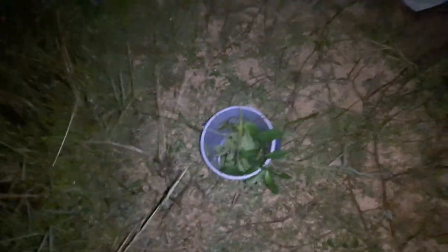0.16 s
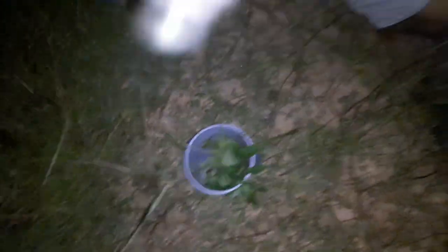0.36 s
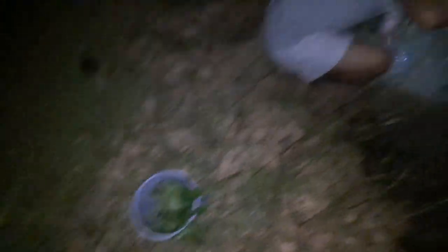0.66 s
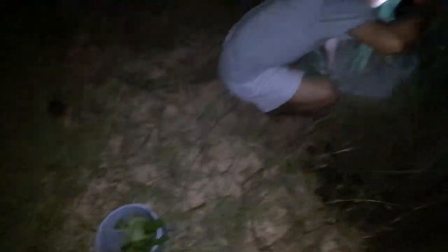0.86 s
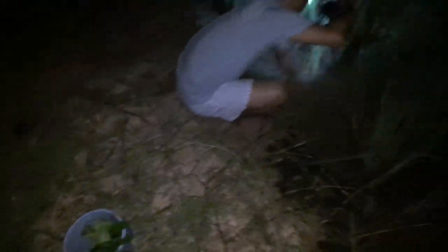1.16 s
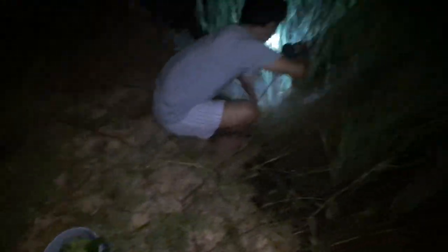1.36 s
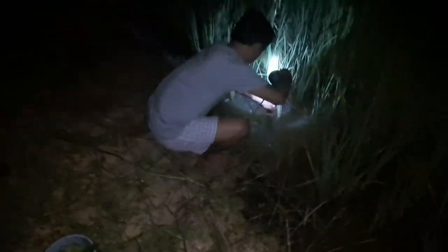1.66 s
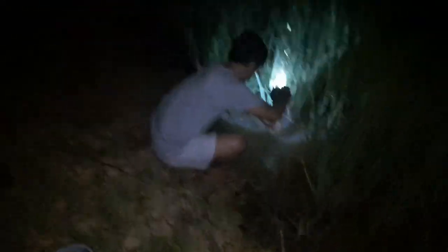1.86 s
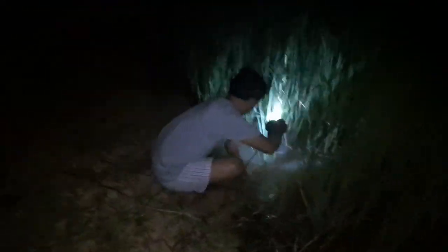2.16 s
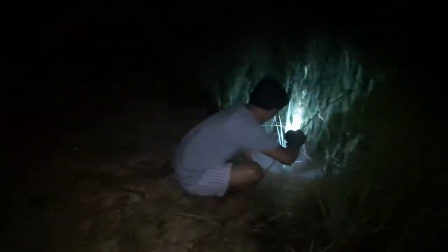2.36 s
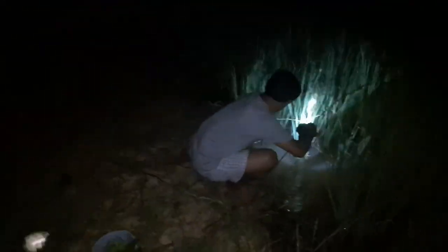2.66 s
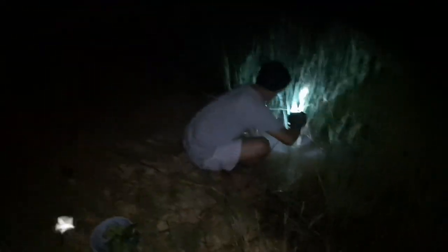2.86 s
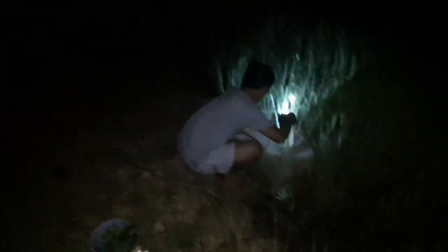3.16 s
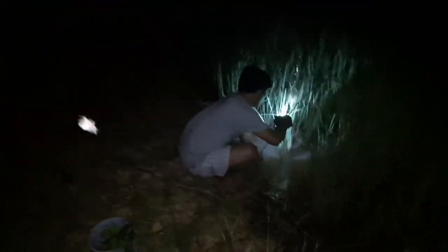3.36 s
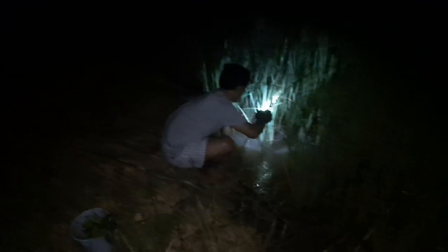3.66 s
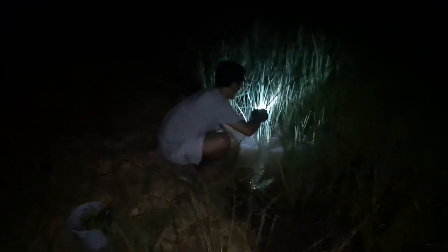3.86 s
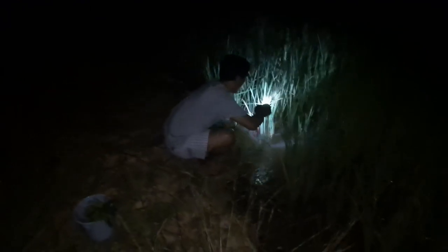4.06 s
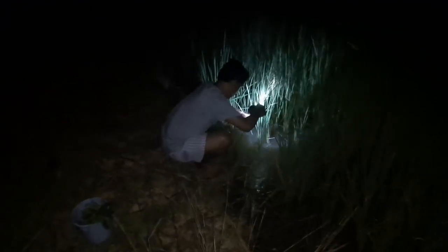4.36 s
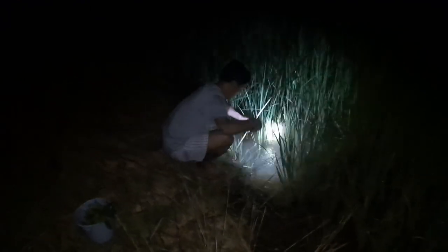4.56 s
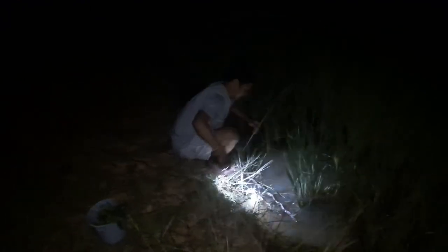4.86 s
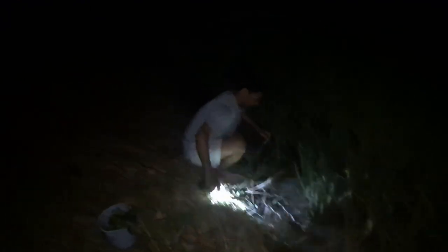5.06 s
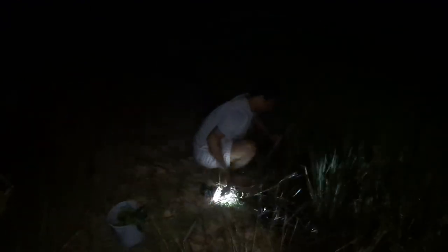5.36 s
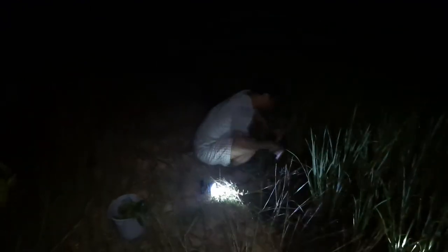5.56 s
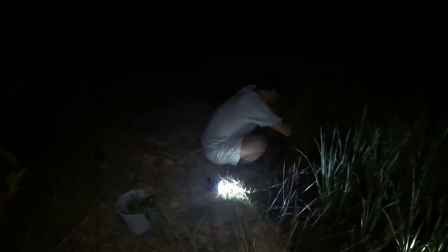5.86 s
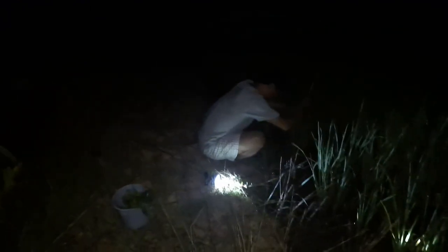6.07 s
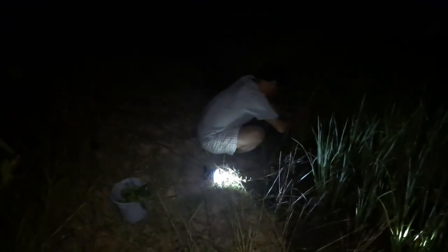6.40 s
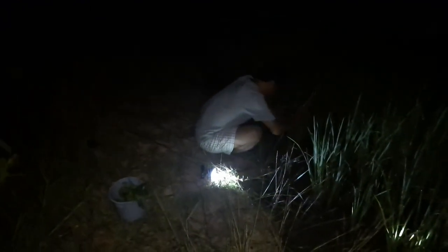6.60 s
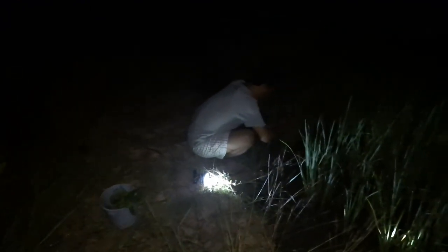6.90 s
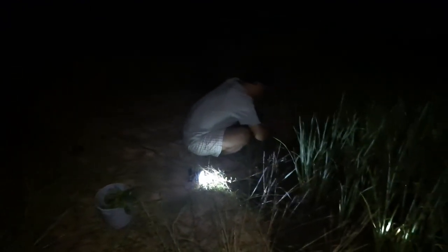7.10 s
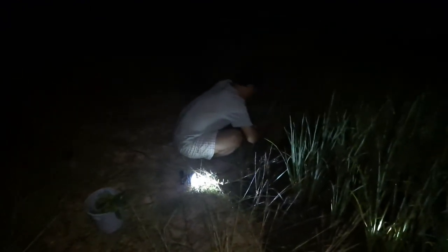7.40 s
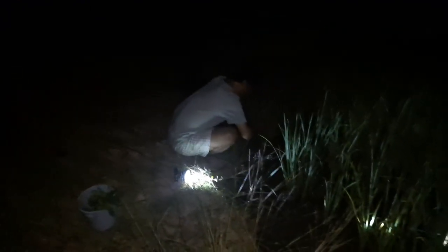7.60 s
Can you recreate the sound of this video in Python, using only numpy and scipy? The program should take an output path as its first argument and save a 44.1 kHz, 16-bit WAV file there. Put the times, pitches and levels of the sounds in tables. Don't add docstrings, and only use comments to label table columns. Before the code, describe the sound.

Continuous insect trill and thin high hiss fill an open, nearly echoless night beside reeds. Wet plops, sloshes and hollow stem knocks begin at once with sharp dry snaps, and soon a sputtering run of frog peeps. Distant frogs rasp rhythmically, one whistles, then another busy burst of clacks and crackle. Later the handling quiets, leaving peeps, small whistles and insects in wide stereo.

```python
import sys
import numpy as np
from scipy import signal
from scipy.fft import rfft, irfft, next_fast_len
from scipy.io import wavfile
from scipy.ndimage import uniform_filter1d, map_coordinates

SR = 44100
rng = np.random.default_rng(int(sys.argv[2]) if len(sys.argv) > 2 else 0)


def boost(x):
    u = np.asarray(x, float) / 20
    return 10 ** u


def file_out(sig):
    cols = np.atleast_2d(sig).T
    lim = np.clip(cols, -1, 1)
    pcm = np.round(lim * 32767).astype(np.int16)
    wavfile.write(sys.argv[1], SR, pcm)


N = 341334

# start in seconds, peak level in dB, pitch in Hz, length in seconds.
PEEPS = [(0.8235, -27.5, 3296, 0.02), (1.074, -38.5, 3100, 0.038), (1.126, -33, 3130, 0.019),
         (1.276, -29, 3170, 0.035), (1.364, -32.5, 3100, 0.024), (1.413, -33.5, 3180, 0.032),
         (1.525, -38, 3200, 0.0092), (4.95, -31, 3297, 0.019), (5.159, -39.5, 3330, 0.042),
         (5.211, -34, 3250, 0.027), (5.368, -30, 3276, 0.025), (5.446, -32.5, 3290, 0.017),
         (5.522, -34.5, 3270, 0.022), (5.68, -30.5, 3300, 0.027), (5.772, -32, 3190, 0.015),
         (5.836, -35.5, 3320, 0.02), (5.877, -36, 3280, 0.012), (7.217, -44, 3354, 0.037),
         (7.392, -40.5, 3430, 0.019), (7.495, -43.5, 3400, 0.019), (7.643, -39, 3220, 0.01),
         (7.701, -36, 3090, 0.005)]


def unit(x):
    return x / np.sqrt(np.mean(x ** 2) + 1e-20)


def along(points, hz):
    f, v = np.transpose(points)
    return np.interp(np.log(hz + 1), np.log(f + 1), v)


def curves(*tables):
    out = np.full((len(tables[0][0]) - 1, N), -120.)
    for s, *cols in map(np.transpose, tables):
        k = np.arange(round(s[0] * SR), min(N, round(s[-1] * SR) + 1))
        out[:, k] = [np.interp(k / SR, s, c) for c in cols]
    return out


def along_time(points):
    return np.interp(np.arange(N) / SR, *np.transpose(points))


def wobble(rate):
    knots = rng.standard_normal(int(N * rate / SR) + 4)
    return map_coordinates(knots, [np.arange(N) * rate / SR])


def filtered(x, response):
    m = next_fast_len(N + 8192)
    return irfft(rfft(x, m) * response(np.fft.rfftfreq(m, 1 / SR)), m)[..., :N]


def modes(table, order=1):
    def response(f):
        total = 0
        for k, (c, w, db) in enumerate(table):
            peak = 1j * f * w / (c * c - f * f + 1j * f * w)
            total = total + (-1) ** k * boost(db) * peak ** order
        return total
    return response


def placed(x, pan_db, lag, wet_db):
    # frequency in Hz, time to fall 60 dB in seconds.
    bank = [(300, 0.12), (3000, 0.18), (10000, 0.036)]
    hz, t, z = signal.stft(rng.standard_normal((2, SR // 3)), SR, nperseg=256)
    fading = z * boost(-60 * t / along(bank, hz)[:, None])
    tail = signal.istft(fading, SR, nperseg=256)[1]
    tail = tail / np.linalg.norm(tail[0])
    wet = signal.fftconvolve(np.pad(x, (300, 0))[None], tail, axes=1)[:, :N]
    side = np.array([[.5], [-.5]])
    direct = filtered(x, lambda f: np.exp(-2j * np.pi * f * lag * side / SR))
    return boost(pan_db * side) * (direct + boost(wet_db) * wet)


def scraped(hz, width_hz, rate, sharp, pure=0):
    beat = np.cumsum(rate * (1 + 0.0043 * wobble(2.947))) / SR
    strokes = np.exp(sharp * np.cos(2 * np.pi * beat))
    noisy = unit(filtered(strokes * rng.standard_normal(N), modes([(hz, width_hz, 0)], order=3)))
    turn = 2 * np.pi * np.cumsum(hz + .11 * width_hz * wobble(70)) / SR
    ring = np.sin(turn) * boost(1.5 * wobble(40))
    return unit((1 - pure) * noisy + pure * unit(strokes ** 1.5 * ring))


def grains(count, hz, spread, cycles, size_db):
    when = (rng.random(count) * N).astype(int)
    pitch = rng.standard_normal(count).clip(-2, 2)
    size = rng.exponential(size=count).clip(0, 3)
    f = (hz[when] * np.exp(spread * pitch))[:, None]
    t = np.arange(int(10.0 * cycles * SR / np.median(hz)))
    u = f * t / SR
    shape = boost(-30 * u / cycles) * (1 - np.exp(-u))
    rows = boost(size_db * size)[:, None] * np.sin(2 * np.pi * u) * shape
    return unit(np.bincount((when[:, None] + t).ravel(), rows.ravel(), N)[:N])


def puffs(calls):
    t = np.arange(0, N, 64) / SR
    slow = sum(boost(db) * np.exp(-((t - s) / (0.56 * length)) ** 4) for s, db, length in calls)
    return np.interp(np.arange(N) / SR, t, slow)


def night_air():
    # frequency in Hz, level in dB per Hz.
    colour = [(25, -14), (45, -29), (88, -0.5), (400, -22.5), (1000, -29.5), (1400, -35), (1750, -14.5),
              (2600, -12), (4200, -12.5), (5740, -24.5), (7000, -15.5), (8300, -18), (11000, -19),
              (13000, -23), (16000, -42)]
    # frequency in Hz, likeness from 0 to 1.
    alike = [(60, .94), (300, 0.85), (700, 0.05), (15000, 0.017)]

    def mid_and_side(f):
        turn = np.arccos(np.clip(along(alike, f), -1, 1)) / 2
        return boost(along(colour, f)) * [np.cos(turn), np.sin(turn)]

    def tilt(f):
        return boost(along([(7000, 0), (9000, 0.46)], f) * [[-1], [1]])

    mid, side = filtered(rng.standard_normal((2, N)), mid_and_side)
    air = unit(filtered(np.array([mid + side, mid - side]), tilt))
    air_db = -44 - 0.64 * np.arange(N) / SR
    return boost(air_db) * air


def far_engine():
    # middle in seconds, level in dB, length in seconds.
    gusts = [
        (0.1, -55, 1.3),
        (2.0, -50.5, 0.34),
        (3.15, -41, 0.75),
        (3.7, -50, 0.31),
        (4.65, -51, 0.29),
        (6.2, -57, 1.2),
        (6.95, -48.5, 0.14),
        (7.6, -49, 0.079),
    ]
    idle_db = -53.5
    loudness = boost(idle_db) + puffs(gusts)
    noise = rng.standard_normal(N) + 0.19 * rng.standard_normal((2, N))
    return boost(-9.0) * loudness * unit(filtered(noise, modes([(64.6, 10.8, 0)], order=2)))


def cricket_trill():
    # time in seconds, level in dB.
    trill = [(0, -47.5), (0.93, -44), (1.33, -47.5), (2.5, -45.5), (4.3, -47), (4.61, -44), (5.1, -46),
             (7, -46.5), (7.74, -47.5)]
    loudness = boost(curves(trill)[0] + 0.83 * wobble(6))
    return placed(loudness * scraped(2140, 450, 122.3, sharp=0.66, pure=.55), pan_db=.5, lag=20.5, wet_db=-8)


def bush_cricket():
    swell_db, peak_s, span_s = 8.5, 5.3, .8
    t = np.arange(N) / SR
    loudness = boost(-65 + swell_db * np.exp(-((t - peak_s) / span_s) ** 2))
    count = np.floor(np.cumsum(203.5 * (1 + 0.00087 * wobble(1.4))) / SR)
    teeth = np.diff(count, prepend=0) * boost(2.4 * wobble(150))
    buzz = unit(filtered(teeth, modes([(10400, 950, 0), (12400, 2000, -6)], order=3)))
    return placed(loudness * buzz, pan_db=-5, lag=0, wet_db=-10)


def katydid():
    # time in seconds, lateness in seconds.
    late = [(0, -.05), (1.5, -.05), (3.4, .07), (4.4, .02), (5.5, 0), (7.75, 0)]
    t = np.arange(N) / SR
    turn = 2 * np.pi * (t - curves(late)[0] - 5.97) / .283
    phrases = 1 / (1 + np.exp(6 * np.cos(turn) - 1.5))
    loudness = boost(-58 + .5 * t + 1.5 * wobble(1.5))
    song = phrases * scraped(8350, 620, 60, sharp=.3, pure=.25)
    return placed(loudness * song, pan_db=-5, lag=14, wet_db=-12)


def tree_cricket():
    t = np.arange(N) / SR
    turn = 2 * np.pi * ((t - 2.04) * 6.2 + .12 * wobble(2))
    chirps = 1 / (1 + np.exp(-(1.2 + .3 * t) * np.cos(turn) - wobble(3)))
    loudness = boost(-59 - .3 * t + 2 * wobble(1.5))
    song = chirps * scraped(7530, 300, 108, sharp=.6)
    return placed(loudness * song, pan_db=1.5, lag=-6, wet_db=-10)


def high_caller():
    blips = [3.25, 3.67, 3.98, 4.31, 4.6, 4.88, 5.14, 5.5, 5.85]
    loudness = boost(-68 + 2 * wobble(2)) + puffs([(s, -60, .04) for s in blips])
    return placed(loudness * scraped(6400, 500, 90, sharp=.3), pan_db=12.5, lag=-11.5, wet_db=-11.5)


def high_drone():
    loudness = boost(-60.0 + 1.2 * wobble(5.5))
    return placed(loudness * scraped(9390, 1760, 210, sharp=0.19), pan_db=-9, lag=10.6, wet_db=3.0)


def far_raspers():
    # middle in seconds, level in dB, small frog over large frog in dB.
    rasps = [(0.36, -46, 9), (0.63, -37.5, -4), (0.84, -39, -2), (1.139, -40, -4), (1.38, -57, 0),
             (1.601, -44, -7), (1.78, -45.5, -13), (1.92, -46.5, -9), (2.18, -37.5, -5), (2.38, -36.5, -1),
             (2.568, -36, -4), (2.76, -39.5, -3), (2.91, -38, -6), (3.1, -44.5, -10), (3.27, -44, -6),
             (3.34, -43, 0), (3.709, -36, 0.5), (4.1, -39, 10), (4.319, -37.5, 8.5), (4.55, -37, 8),
             (4.814, -37.5, 7), (5.03, -32.5, -3), (5.22, -38.5, 7), (5.46, -40.5, 8), (5.66, -37.5, 4),
             (5.84, -47, 0), (6.05, -39, -6), (6.22, -52, -13), (6.34, -64, -7), (6.7, -45, 6),
             (6.91, -43.5, -6), (7.14, -44, 0), (7.24, -44, -3), (7.39, -47, -9), (7.51, -46, -3)]
    rasp_s = .06
    large = puffs([(s, db - tilt / 2, rasp_s) for s, db, tilt in rasps])
    small = puffs([(s, db + tilt / 2, rasp_s) for s, db, tilt in rasps])
    large = large * scraped(3340, 620, 47, sharp=0.11)
    small = small * unit(scraped(3586, 230, 58, sharp=0.58) + scraped(3886, 300, 70, sharp=0.51))
    return placed(boost(-9.5) * (large + small), pan_db=0.6, lag=-8, wet_db=-4.0)


def noise_puffs():
    # middle in seconds, level in dB, length in seconds.
    single_puffs = [(0.09, -47.5, 0.0065), (0.44, -66, 0.31), (0.63, -50, 0.015), (1.78, -68, 0.12),
                    (1.92, -68, 0.046), (2.14, -57.5, 0.031), (2.72, -61, 0.032), (2.9, -62, 0.079),
                    (3.11, -67, 0.062), (3.44, -55.5, 0.02), (3.86, -54.5, 0.026), (6.66, -59, 0.013),
                    (6.89, -71, 0.32), (7.13, -58, 0.02)]
    halo_db, halo_longer = -22, 1.1
    halos = [(s + length / 2, db + halo_db, halo_longer * length) for s, db, _, length in PEEPS]
    sound = boost(10.5) * puffs(single_puffs + halos) * scraped(3050, 1600, 95, sharp=0.11)
    return placed(sound, pan_db=15.5, lag=9.9, wet_db=-12.5)


def far_row():
    row = boost(-57 + 2.5 * wobble(9)) * scraped(3900, 600, 110, sharp=0.5, pure=.3)
    return placed(row, pan_db=0.5, lag=17.7, wet_db=1.5)


def beetle():
    # middle in seconds, level in dB, length in seconds.
    passes = [
        (0.25, -57, .2),
        (2.75, -62.5, 0.52),
        (4.3, -65, 0.14),
        (4.85, -62, .2),
        (5.3, -64.5, 0.156),
        (6.4, -64.5, 0.53),
    ]
    return placed(puffs(passes) * scraped(265, 101, 30, sharp=0.068), pan_db=2.5, lag=1, wet_db=-13)


def chirper():
    # start in seconds, level in dB, length in seconds.
    chirps = [
        (3.518, -40, 0.036),
        (3.783, -40.5, 0.045),
        (4.015, -42, 0.046),
        (4.24, -43.5, 0.066),
        (4.464, -41.5, 0.055),
        (4.689, -38.5, 0.043),
    ]
    # multiple of the voice's base pitch, level in dB.
    overtones = [(4, -17), (6, -10.5), (7, -11.5), (8, 0)]
    eighth_hz, droop = 3330, 0.079
    out = np.zeros(N)
    for s, db, length in chirps:
        u = np.arange(round(length * SR)) / (length * SR)
        turn = 2 * np.pi * np.cumsum(eighth_hz / 8 * (1 - droop * u ** 3)) / SR
        shape = np.minimum(u / .12, 1) * (1 - u ** 6)
        stack = sum(boost(level) * np.sin(k * turn) for k, level in overtones)
        out[round(s * SR):][:len(u)] += boost(db) * shape * stack
    return placed(out * boost(1.7 * wobble(120)), pan_db=0.5, lag=1.2, wet_db=-5.0)


def whistle(start, s, end, hz, db, glide_hz, keeps_rising):
    hold = .72 * (end - s)
    rise = keeps_rising * glide_hz
    sag_hz = 40
    return [(start, hz - glide_hz * (s - start), min(-57, db - 21)),
            (s, hz, db),
            (s + hold, hz + rise * hold - sag_hz / 4, db - 5),
            (end, hz + rise * (end - s) - sag_hz, db - 19)]


def whistlers():
    # start, loudest and end in seconds, strongest overtone in Hz, level in dB.
    near_frog = [
        (0.56, 0.68, 0.765, 3950, -41),
        (2.7, 2.826, 2.915, 3958, -31),
        (4.54, 4.655, 4.735, 3950, -35),
        (6.43, 6.542, 6.63, 3938, -37),
        (7.01, 7.04, 7.075, 4000, -52),
    ]
    # start, loudest and end in seconds, strongest overtone in Hz, level in dB.
    farther_frog = [
        (0.745, 0.775, 0.805, 4150, -51),
        (0.9, 1.0, 1.1, 4020, -46),
        (4.41, 4.47, 4.54, 4100, -52),
        (6.14, 6.19, 6.24, 4030, -54),
        (6.275, 6.295, 6.325, 4040, -53),
        (6.77, 6.83, 6.9, 4080, -53),
    ]
    # multiple of the base pitch, level in dB.
    beside = [(2, -46), (3, -12), (4, -18), (5, -26), (7, -19.5), (8, -35)]
    knee = boost(-34.5)
    notes = 0
    for frog, glide_hz, keeps in (near_frog, 750, False), (farther_frog, 1550, True):
        hz, db = curves(*[whistle(*row, glide_hz, keeps) for row in frog])
        turn = 2 * np.pi * np.cumsum(hz.clip(3800) / 6) / SR
        gain = uniform_filter1d(boost(db + 9.5 - 2 * keeps), size=500)
        gain = gain * boost((1.2 + keeps) * wobble(70))
        others = sum(boost(level) * np.sin(k * turn) for k, level in beside)
        notes = notes + gain * np.sin(6 * turn) + boost(6) * gain / (1 + gain / knee) * others
    return placed(notes, pan_db=2.2, lag=3, wet_db=-19)


def peepers():
    # pitch in Hz, width in Hz, level in dB.
    sac = [(1830, 170, -42), (2264, 1000, 4.5), (3185, 980, 4.5), (4820, 1200, -1.5)]
    rasp_share, waver_hz = .2, 60
    echo_s, echo_db = .031, -13
    tone, rasp = np.zeros((2, N + SR))
    waver, flutter = wobble(160), boost(2.5 * wobble(250))
    t = np.arange(SR // 8) / SR
    for s, db, hz, length in PEEPS:
        shape = np.minimum(t / 0.001, 1) / (1 + np.exp((t - length) / 0.003))
        turn = 2 * np.pi * hz * t * (1.012 - 12 * t * t)
        turn += 2 * np.pi * waver_hz * np.cumsum(np.resize(waver[round(s * SR):], len(t))) / SR
        pulses = np.exp(.7 * np.cos(turn / 11)) * rng.standard_normal(len(t)) * boost(3 - 180 * t)
        first = round(s * SR) - 40
        at = slice(first, first + len(t))
        swell = shape * np.minimum(0.37 + t / 0.012, 1)
        tone[at] += boost(db - 0.9) * (1 - rasp_share) * swell * (np.sin(turn) + 0.092 * np.sin(turn / 2))
        rasp[at] += boost(db + 11.0) * rasp_share * shape * pulses
    call = flutter * tone[:N] + filtered(rasp[:N], modes(sac, order=3))
    call = call + boost(echo_db) * np.roll(call, round(echo_s * SR))
    return placed(call, pan_db=-0.5, lag=2.3, wet_db=-7.0)


def fly():
    # time in seconds, wing beat in Hz, level in dB.
    flight = [
        (4.955, 292, -73),
        (4.985, 291.4, -51),
        (5.02, 270, -67),
    ]
    hz, db = curves(flight)
    turn = 2 * np.pi * np.cumsum(hz.clip(1)) / SR
    overtones = [(1, 5.5), (2, 6.0), (3, 0), (4, -10), (5, -5)]  # multiple, dB
    buzz = sum(boost(level) * np.sin(k * turn) for k, level in overtones)
    return boost(db + np.array([[-14], [3]])) * buzz


def rustle():
    # time in seconds, level in dB.
    stalks = [(0.0, -102), (0.27, -74), (0.98, -97), (1.21, -62), (1.6, -66), (2.53, -76.5), (3.13, -69.5),
              (3.92, -59), (4.11, -67)]
    # middle in seconds, level in dB, length in seconds.
    brushes = [
        (0.2, -58, 0.62),
        (0.4, -62, 0.1),
        (2.16, -62, 0.12),
        (3.43, -60, 0.029),
        (3.56, -71, .05),
        (3.89, -65, 0.16),
    ]
    # frequency in Hz, level in dB per Hz.
    colour = [(1000, -26), (1500, -10), (3000, -7), (6000, -6), (9500, -1), (13000, -1), (16000, -5)]
    crackle = grains(count=20000, hz=np.full(N, 9000), spread=1.0, cycles=0.16, size_db=7.5)
    crackle = crackle + 0.84 * rng.standard_normal(N)
    crackle = unit(filtered(crackle, lambda f: boost(along(colour, f))))
    swish_db, clump_db = 1.5 * wobble(15), 3.2 * wobble(70).clip(-2, 2)
    loudness = (boost(curves(stalks)[0]) + puffs(brushes)) * boost(6.0 + swish_db + clump_db)
    return placed(loudness * crackle, pan_db=-4.5, lag=5, wet_db=3)


def snaps():
    # start in seconds, peak level in dB, body level over the peak in dB.
    breaks = [(0.285, -18, -24), (0.376, -44, -2), (0.4994, -32, -2), (0.614, -34.5, 8), (0.627, -28, 3),
              (0.759, -28, -16), (0.834, -34, -5), (0.704, -17, -16), (1.1968, -21, -15), (1.503, -25, -10),
              (1.79, -35, -4), (2.1025, -22.5, -11), (2.196, -46, 12), (2.2947, -26, -20), (3.4077, -35, 3),
              (3.4322, -15, -25), (3.714, -42, 4), (3.838, -46, -1), (3.8696, -15, -10), (3.9195, -44, 13),
              (4.8713, -31, -12), (5.499, -54, 24)]
    sharp, body = np.zeros((2, N + SR))
    t = np.arange(SR // 30) / SR
    for s, db, body_db in breaks:
        at = slice(round(s * SR), round(s * SR) + len(t))
        sharp[at] += boost(db - 60 * t / 0.02) * np.minimum(t / .006, 1) * rng.standard_normal(len(t))
        body[at] += boost(db + body_db - 3 - 60 * t / 0.03) * rng.standard_normal(len(t))
    sound = filtered(sharp[:N], modes([(12500, 8000, 0)], order=2))
    sound = sound + filtered(body[:N], modes([(6800, 9000, 2)], order=2))
    return placed(sound, pan_db=-6.5, lag=6, wet_db=-7)


def ticks():
    # start in seconds, peak level in dB.
    cracks = [
        (0.0625, -35.5),
        (3.7137, -31),
        (3.8132, -35),
        (3.8712, -37),
        (5.4555, -33),
        (7.7, -64),
    ]
    blow_s = 0.000078
    out, u = np.zeros(N), np.arange(SR // 200) / SR / blow_s
    for s, db in cracks:
        out[round(s * SR):][:len(u)] += boost(db + 18) * u * (2 - u) * np.exp(-u)
    return placed(out, pan_db=1.0, lag=1.0, wet_db=-3.5)


def stirred_water():
    # peak time and length in seconds, mud and slosh levels in dB, bubble pitch in Hz.
    steps = [(0.038, 0.098, -53, -36, 790), (0.28, 0.53, -77, -51, 1160), (0.521, 0.058, -54, -42.5, 900),
             (0.62, 0.11, -46, -54, 920), (0.725, 0.22, -45.5, -44, 900), (0.842, 0.11, -55, -43, 1290),
             (1.251, 0.048, -57, -39, 863), (1.358, 0.13, -51.5, -41, 837), (1.725, 0.4, -92, -54, 1190),
             (2.188, 0.04, -45.5, -43.5, 1100), (2.252, 0.22, -58.5, -51, 1100),
             (2.878, 0.11, -59.5, -45, 1290), (3.073, 0.075, -78, -52.5, 1150),
             (3.431, 0.014, -48, -27.5, 1080), (3.569, 0.09, -50, -49, 1180), (3.871, 0.11, -46, -38, 956),
             (3.958, 0.064, -45, -44, 1035), (5.499, 0.051, -55, -50.5, 770)]
    s, length, mud_db, slosh_db, hz = np.transpose(steps)[..., None]
    t = np.arange(0, N, 64) / SR
    shape_db = np.minimum(20 * (t - s), 21.5 * (s - t)) / length
    strongest = (slosh_db + shape_db).argmax(0)
    slow = boost(mud_db + shape_db).sum(0), boost(slosh_db + shape_db).sum(0), hz[strongest, 0]
    mud, slosh, bubble_hz = [np.interp(np.arange(N) / SR, t, c) for c in slow]
    water = mud * grains(count=2500, hz=np.full(N, 350), spread=0.18, cycles=6.0, size_db=1.0)
    bubbles = grains(count=5000, hz=1.215 * bubble_hz.clip(600), spread=0.22, cycles=11.7, size_db=0.0)
    return water + slosh * bubbles


def plops():
    # start in seconds, peak level in dB, pitch in Hz.
    pockets = [(0.012, -27, 780), (0.035, -26, 680), (0.084, -40, 636), (0.513, -24, 316),
               (0.535, -28, 980), (0.718, -30, 1030), (0.745, -34, 770), (0.775, -30.5, 770),
               (0.84, -31, 836), (0.604, -24.5, 340), (0.624, -13, 345), (0.708, -23, 350),
               (1.245, -32, 780), (1.272, -32, 960), (1.285, -32, 850), (1.35, -30.5, 442),
               (1.377, -22, 828), (1.751, -36, 1245), (1.776, -36.5, 1166), (2.148, -28.5, 254),
               (2.188, -32.5, 455), (2.215, -31, 920), (3.43, -27, 394), (3.558, -33, 350),
               (3.712, -34, 537), (3.748, -34.5, 790), (3.815, -35, 394), (3.85, -28.5, 320),
               (3.959, -26, 1310), (5.187, -43.5, 1100), (5.5, -37, 1290)]
    rings, slaps = np.zeros((2, N + SR))
    t = np.arange(SR // 5) / SR
    for s, db, hz in pockets:
        t60 = 0.029 * (1000 / hz) ** 0.32
        ring = np.sin(2 * np.pi * hz * t * (1 + 0.36 * t)) * boost(-60 * t / t60) * (1 - np.exp(-t * hz / 2.0))
        at = slice(round(s * SR), round(s * SR) + len(t))
        rings[at] += boost(db + 3.5) * ring
        slaps[at] += boost(db - 9 + 7 - 60 * t / 0.026) * rng.standard_normal(len(t))
    return rings[:N] + filtered(slaps[:N], modes([(900, 1600, 0)], order=2))


def clacks():
    # start in seconds, peak level in dB, pitch in Hz.
    knocks = [(0.062, -16, 840), (0.121, -49, 778), (0.169, -22.5, 1250), (0.215, -36, 950),
              (0.478, -34, 778), (0.916, -34, 1050), (1.197, -28, 1680), (1.457, -32, 1380),
              (1.324, -22.5, 950), (3.425, -20.5, 1200), (3.466, -29.5, 900), (3.502, -30, 1230),
              (3.537, -32, 1140), (3.559, -29.5, 1050), (3.573, -33, 1300), (3.64, -40, 1120),
              (3.705, -28, 990), (3.795, -22.5, 1330), (3.813, -18.5, 1080), (3.85, -32, 930),
              (3.864, -20, 1280), (3.87, -25, 920), (3.9, -21, 985), (3.934, -32, 980), (3.986, -31, 920),
              (5.454, -28, 885), (7.698, -45.5, 800)]
    out, t = np.zeros(N + SR), np.arange(SR // 5) / SR
    for s, db, hz in knocks:
        out[round(s * SR):][:len(t)] += boost(db - 4 - 60 * t / .014) * np.sin(2 * np.pi * hz * t)
    return out[:N]


def wading():
    # time in seconds, samples the left microphone is late.
    wader_lag = [(0, 13), (0.6, 9), (0.85, 6), (1.2, 2), (2.2, 1), (7.75, 1)]
    water = stirred_water() + plops() + clacks()
    left, right = placed(water, pan_db=0.5, lag=0, wet_db=-11.5)
    left = map_coordinates(left, [np.arange(N) - along_time(wader_lag)])
    return np.array([left, right])


def scene():
    background = night_air() + far_engine()
    insects = cricket_trill() + bush_cricket() + katydid() + tree_cricket() + high_caller() + high_drone()
    far_frogs = far_raspers() + noise_puffs() + far_row()
    near_frogs = chirper() + whistlers() + peepers()
    stalks = rustle() + snaps() + ticks()
    return background + insects + far_frogs + beetle() + near_frogs + fly() + stalks + wading()


def band_limit(x):
    return signal.sosfilt(signal.butter(12, 16650, fs=SR, output="sos"), x)


def record(dry):
    top_hz = 15800
    mix = filtered(dry, lambda f: f < top_hz)
    return band_limit(mix)


dry = scene()
out = record(dry)
file_out(out)
```